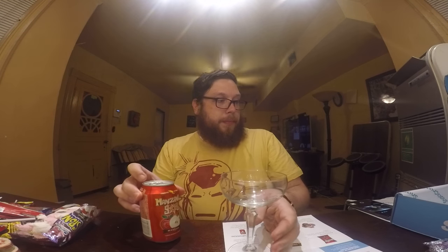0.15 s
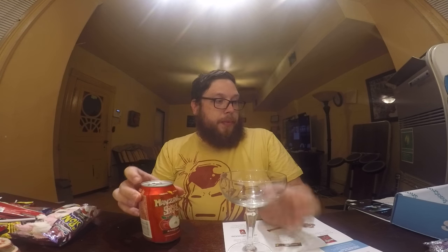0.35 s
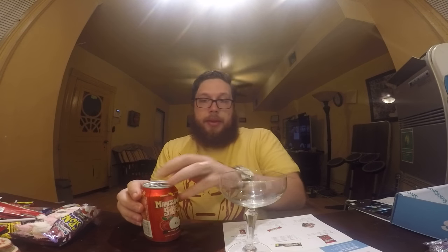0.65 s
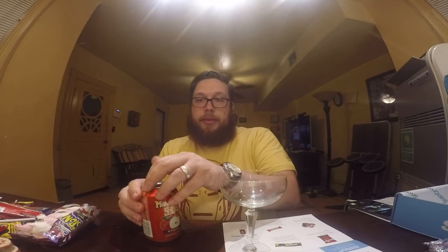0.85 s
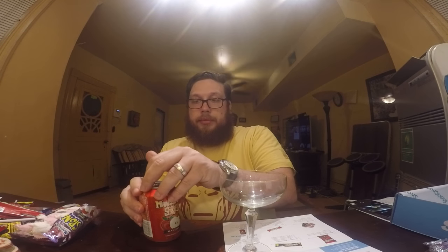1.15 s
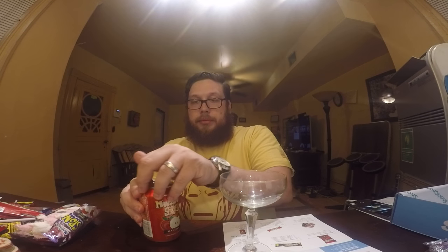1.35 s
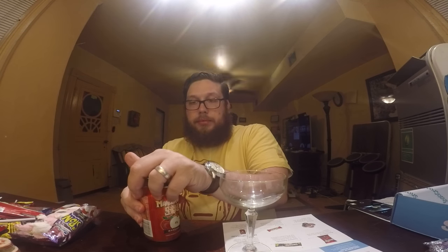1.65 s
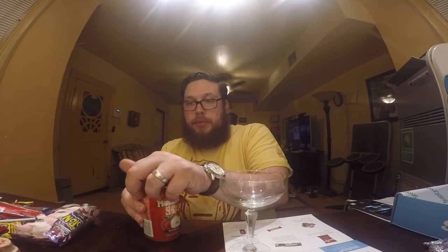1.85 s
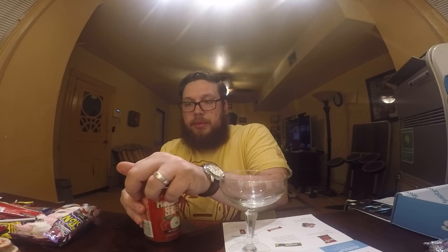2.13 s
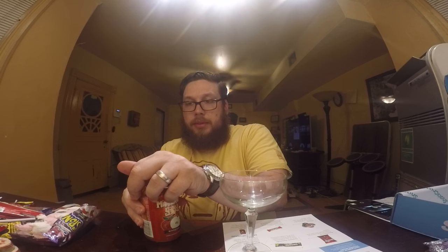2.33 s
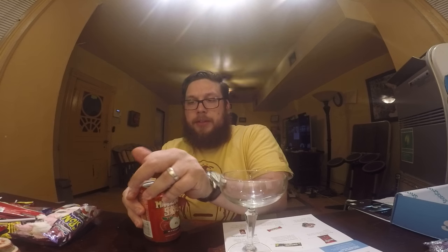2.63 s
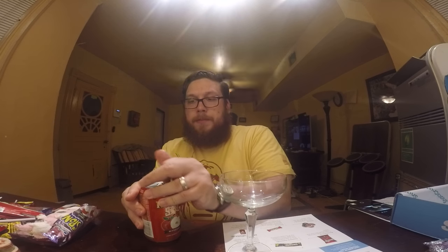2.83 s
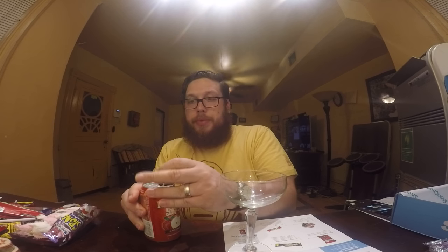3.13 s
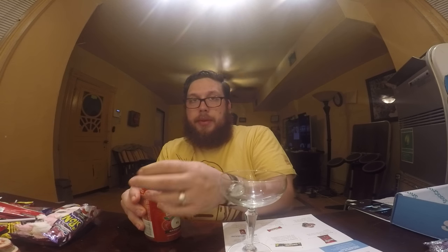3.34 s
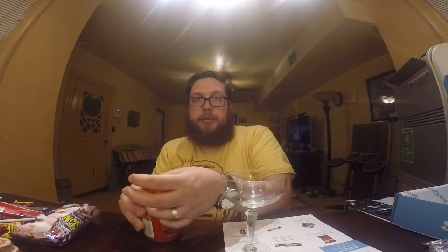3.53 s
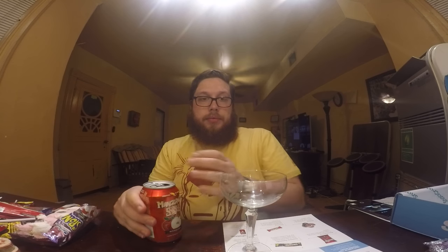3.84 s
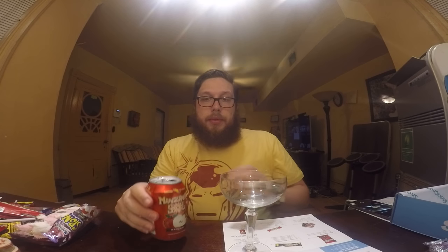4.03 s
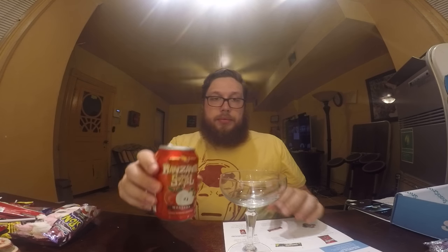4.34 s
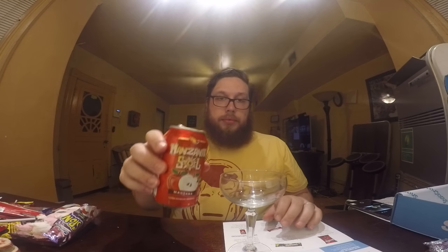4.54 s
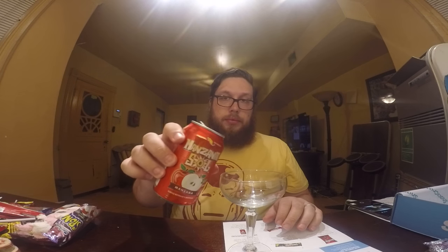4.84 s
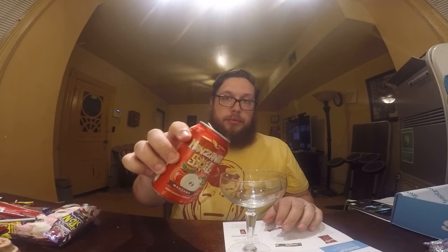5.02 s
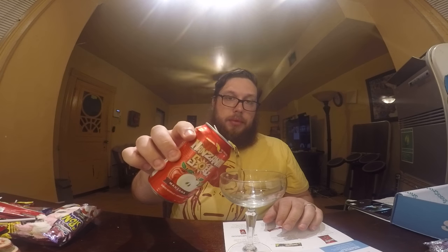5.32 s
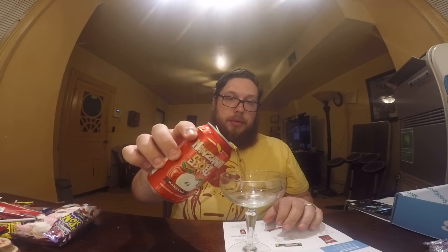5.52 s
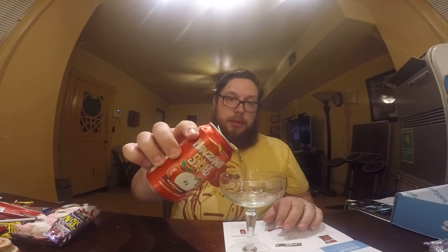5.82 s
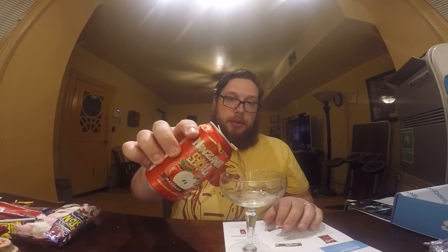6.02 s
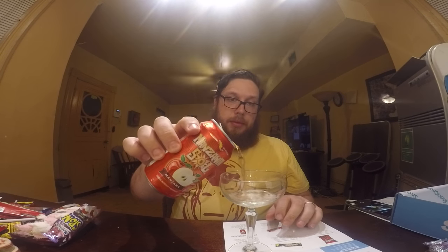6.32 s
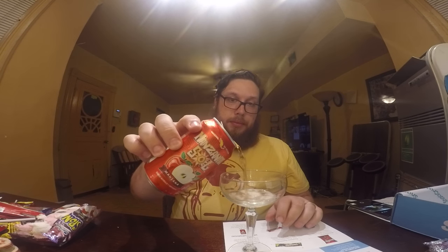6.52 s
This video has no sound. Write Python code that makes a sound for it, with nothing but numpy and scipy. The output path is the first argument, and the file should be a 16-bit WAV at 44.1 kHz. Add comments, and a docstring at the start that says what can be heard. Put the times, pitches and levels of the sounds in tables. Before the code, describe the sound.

Close to the microphone, in a room with a steady low hum, a can knocks on a table and a glass rings faintly. A soda can is then opened: a brief hiss and sharp crack, some small clicks, and a louder snap of metal. Fingers brush and bump the can lightly. Near the end, soda trickles into a glass, gently gurgling while tiny bubbles pop and fizz.

```python
"""A machine hums in a room as a drink can is set down: the table top thuds and a glass on it clinks.
The tab ticks, gas hisses through the broken seal, and the lid tears and snaps, ringing the metal.
After the loud snaps, gain control lowers the room noise, which then slowly recovers.
Last, the drink is poured into the shallow glass: trapped air pockets resonate as gurgles,
and small bubbles pop and fizz."""
import sys
import numpy as np
from scipy import signal
from scipy.fft import rfft, irfft
from scipy.io import wavfile
from scipy.ndimage import uniform_filter1d

SR = 44100
rng = np.random.default_rng(int(sys.argv[2]) if len(sys.argv) > 2 else 0)


def log_audio(samples):
    """Write samples as a 16-bit WAV file to the path given in sys.argv[1]."""
    # one column per channel
    frames = np.atleast_2d(samples).T
    # limit to full scale, then quantise
    limited = np.clip(frames, -1, 1)
    pcm = np.round(limited * 32767).astype(np.int16)
    wavfile.write(sys.argv[1], SR, pcm)


N = 294147

# ticks and snaps of tab and lid: (time [s], crack peak [dB], tilt [dB/octave], ring re crack [dB])
SNAPS = [(1.08, -33.5, 2, -11), (1.738, -53, 1.5, -3), (1.75, -43.5, -1.5, -2.5), (1.783, -32, -4, -10),
         (1.795, -44.5, 1.5, 2), (1.978, -11.5, 3.5, -13), (2.0393, -13.5, -3, -0.5),
         (2.052, 1.5, -1, -1.2), (2.059, -15.5, 2, -3), (2.333, -32.5, -0.5, -6.5), (2.356, -34, -2, -2),
         (2.3914, -19.5, 0.5, 0.5), (2.468, -24, 2, 3.5), (2.473, -20, 0.5, -6), (2.532, -34.5, -0.5, -0.2),
         (2.546, -24.5, -1.2, -2.5), (2.562, -26.5, 2, -1), (2.5737, 12, -0.3, -3.5),
         (2.7884, -24.5, 3, -12), (2.9034, -33, 0, -14), (2.912, -50, 7, -8), (2.981, -45.5, 0, 0),
         (3.169, -50.5, -1.5, 2.5), (3.479, -38, -4.5, -9)]
# the metal giving way: (frequency [Hz], spectral level [dB])
CRACK_SPECTRUM = [(100, -23.5), (400, -10), (1100, -19.5), (1800, 1.5), (3000, -2), (5500, -4.5),
                  (6700, -10), (7800, -9), (9500, -13.5), (15500, -25)]
# lid and wall of the can: (frequency [Hz], level [dB], t60 [s])
CAN_MODES = [(550.8, -17.5, 0.018), (1014, -16, .015), (1380, -12, 0.01), (1820, -2.5, 0.011),
             (2370, -5.5, 0.008), (2650, -3, .008), (3032, -3, 0.014), (3480, -3.5, .009),
             (3847, -1, 0.009), (4150, -3.5, .009), (4800, -4, 0.014), (5460, 2, 0.008), (5800, -7, .008),
             (7500, -8.5, 0.007)]


def lid_snaps():
    """Impulsive excitation: yielding metal gives a crack of noise and sets the can's modes ringing."""
    out = np.zeros(N)
    for time, db, tilt_db, ring_db in SNAPS:
        crack = burst(CRACK_SPECTRUM, tilt_db, pivot_hz=3000, t60=0.018, rise=0.00036)
        metal = ring(CAN_MODES, tilt_db, pivot_hz=3000, t60_scale=1.1, spread_db=1.8, rise=0.0004)
        add(out, time, amp(db) * crack)
        add(out, time, amp(db + ring_db) * metal)
    return out


# a leak, the rush and a last puff: (time [s], rise [s], hold [s], fall [s], level [dB])
GAS_PUFFS = [(1.983, .008, .014, .01, -39), (1.999, 0.01, .031, .03, -18), (2.052, .008, .004, .07, -28.5)]
# the gas jet: (frequency [Hz], spectral level [dB])
JET_SPECTRUM = [(120, -41), (200, -28), (827, -21.5), (1210, -16), (1840, -5.5), (2290, -3.5), (3300, -8),
                (5000, -4), (6800, -6), (8350, -9), (9310, -4.5), (15500, -8.5)]


def gas_hiss():
    """Turbulent jet noise: gas under pressure escapes through the seal."""
    jet = np.zeros(N)
    for time, *envelope in GAS_PUFFS:
        add(jet, time, stroke(*envelope, JET_SPECTRUM))
    sputter_db = 0.51 * unit_rms(uniform_filter1d(rng.standard_normal(N), size=60))
    return jet * amp(sputter_db)  # foam chokes the jet


# large air pockets dragged under by the stream: (time [s], level [dB], frequency [Hz])
GLUGS = [(5.658, -40, 2200), (5.7078, -31, 2484), (5.7678, -29.5, 2730), (5.7795, -33, 1660),
         (5.8225, -37, 1300), (5.8425, -41, 1190), (5.889, -41, 1410), (5.901, -35.5, 1550),
         (5.9952, -25.5, 1564), (6.0806, -34, 1370), (6.1397, -27.5, 1453), (6.1694, -31.5, 1550),
         (6.2038, -37, 1610), (6.2248, -35.5, 1350), (6.2417, -35, 1360), (6.2706, -25.5, 1550),
         (6.35, -32, 1630), (6.3707, -35, 1380), (6.3903, -36, 1460), (6.4043, -22.5, 1206),
         (6.4092, -25.5, 1454), (6.4197, -25.5, 1560), (6.4266, -28, 1230), (6.457, -35, 1310),
         (6.476, -19.5, 1188), (6.5222, -36.5, 980), (6.547, -38.5, 997), (6.577, -31.5, 1230),
         (6.5883, -37, 1480), (6.6144, -34, 1120), (6.6493, -41.5, 1210)]
BABBLE_START_S, BABBLE_DB, BABBLE_HZ, SINK_HZ_PER_S = 5.8, -47.5, 1550, 300


def gurgles():
    """Bubble resonance: each trapped air pocket pulsates as a spring against the mass of the liquid."""
    out = np.zeros(N)
    # faint pockets between the large ones, deeper as the glass fills
    when, loudness, pitch = rng.random((40, 3)).T
    elapsed = when * (N / SR - BABBLE_START_S)
    babble_db = BABBLE_DB + 12 * (loudness - 0.5)
    babble_hz = (BABBLE_HZ - SINK_HZ_PER_S * elapsed) * (1 + 0.42 * (pitch - 0.5))
    for time, db, hz in [*GLUGS, *zip(BABBLE_START_S + elapsed, babble_db, babble_hz)]:
        add(out, time, amp(db) * bubble(hz, t60=31 / hz, glide=0.094))
        split_pocket = bubble(hz * rng.uniform(1.9, 2.44), t60=0.0078, glide=0.1)
        add(out, time, amp(db - 23) * split_pocket)
        spray = burst(FILM_SPECTRUM, tilt_db=-2.8, pivot_hz=6000, t60=0.053, rise=0.0019)
        add(out, time, amp(db - 29) * spray)
    return out


# the clearest bursting bubbles: (time [s], level [dB], frequency [Hz], click re tone [dB])
POPS = [(5.6325, -49, 10940, -4), (5.717, -48, 2940, 5), (5.7343, -45, 6830, 0), (5.742, -41, 5800, -11),
        (5.769, -33, 3130, 3), (5.7756, -28.5, 4600, -16), (5.843, -42, 5340, -6), (5.924, -44.5, 6340, -4),
        (5.9809, -40.5, 7300, 0), (6.005, -40, 2710, -7), (6.0094, -46, 4760, -5),
        (6.1442, -40.5, 3070, -3), (6.1574, -43, 5400, -6), (6.2027, -43, 4320, -4), (6.271, -38, 3820, 2),
        (6.3255, -49, 5140, -5), (6.3663, -39.5, 5550, -7), (6.379, -41.5, 6440, 3),
        (6.4182, -44.5, 4530, 6), (6.649, -47, 5000, -9)]
# a bubble's film tearing: (frequency [Hz], spectral level [dB])
FILM_SPECTRUM = [(1500, -20), (3000, 3), (6000, -6), (10000, 2), (15500, -15)]


def pops():
    """Film rupture and cavity resonance: a bursting bubble clicks, then rings briefly."""
    out = np.zeros(N)
    for time, db, hz, click_db in POPS:
        add(out, time, amp(db) * bubble(hz, t60=67 / hz, glide=0.2))
        click = burst(FILM_SPECTRUM, tilt_db=0, pivot_hz=6000, t60=0.0049, rise=0.00012)
        add(out, time, amp(db + click_db) * click)
    return out


# the fizz following the flow: (time [s], level [dB])
FIZZ_LEVELS = [(5.552, -83), (5.72, -62), (5.87, -68), (6.0, -67.5), (6.3, -59.5), (6.45, -67.5),
               (6.67, -66)]
FIZZ_POPS_PER_S = 800


def fizz():
    """Shot noise: tiny independent pops of 16 pitches add up to a crackle."""
    strength = amp(4.5 * np.minimum(rng.exponential(1, N), 3.5))
    impulses = strength * (rng.random(N) < FIZZ_POPS_PER_S / SR)
    pitch_index = rng.integers(0, 16, N)
    crowd = np.zeros(N)
    for k, hz in enumerate(np.geomspace(2400, 14500, 16)):
        pop = amp(-1.5 * np.log2(hz / 5000)) * bubble(hz, t60=50 / hz, glide=0.1513)
        crowd += signal.oaconvolve(impulses * (pitch_index == k), pop)[:N]
    times, db = np.transpose(FIZZ_LEVELS)
    return unit_rms(crowd) * amp(np.interp(np.arange(N) / SR, times, db, left=-120))


# hand and can striking the table: (time [s], ring peak [dB], tilt [dB/octave], t60 scale [ratio])
THUDS = [(.175, -12.5, 0.3, 0.63), (.196, -20, -7.5, .6), (.486, -25.5, -1, 0.45), (.504, -25, -8, 0.85),
         (1.082, -31.5, -2.5, 0.35), (2.051, -29, -0.5, 0.73), (2.573, -13.5, -3, 0.6),
         (3.187, -22.5, 2.5, 0.59), (3.677, -33.5, -1, 0.72), (3.711, -36, -4.5, 0.9)]
# contact noise of a knock: (frequency [Hz], spectral level [dB])
CONTACT_SPECTRUM = [(60, -12.5), (130, -1), (300, 0.7), (800, -10), (1500, -22.5), (2400, -34.5),
                    (6000, -46.5), (12000, -63)]
# the table top: (frequency [Hz], level [dB], t60 [s])
TABLE_MODES = [(79.5, -2, 0.075), (137, -0.1, .14), (189, -3.5, 0.24), (233, 0, 0.14), (326, -6, 0.05),
               (428, -3, 0.05), (498.8, -5.5, 0.099), (625, -5.5, 0.11), (818, -9, 0.043),
               (1320, -19.5, 0.04)]


def table_thuds():
    """Plate vibration: an impact and one rebound excite the low modes of the table top."""
    out = np.zeros(N)
    for time, db, tilt_db, t60_scale in THUDS:
        contact = burst(CONTACT_SPECTRUM, tilt_db, pivot_hz=300, t60=0.06 * t60_scale, rise=0.001)
        blow = ring(TABLE_MODES, tilt_db, 300, t60_scale, spread_db=1, rise=0.0039)
        rebound = ring(TABLE_MODES, tilt_db - 5, 300, t60_scale, spread_db=0.54, rise=0.0041)
        add(out, time, amp(db - 5.5) * contact)
        add(out, time, amp(db) * blow)
        add(out, time + 0.014, amp(db - 4.5) * rebound)
    return out


# jolts that reach the glass: (time [s], peak [dB], t60 scale [ratio])
CLINKS = [(.175, -24.5, 1.1), (1.08, -35, 0.56), (2.903, -41, .4), (3.479, -47, 0.38)]
# the glass on the table: (frequency [Hz], level [dB], t60 [s])
GLASS_MODES = [(1380, -15, 0.32), (2180, -3, 0.042), (2376, -2, 0.052), (2750, 7, 0.011),
               (4650, -14.5, 0.021), (5410, -16, .03)]


def glass_clinks():
    """Free vibration: the jolted glass rings at its natural frequencies."""
    out = np.zeros(N)
    for time, db, t60_scale in CLINKS:
        add(out, time, amp(db) * ring(GLASS_MODES, 0, 2000, t60_scale, spread_db=0.8, rise=0.00035))
    return out


# hand movements: (time [s], rise [s], hold [s], fall [s], level [dB])
BRUSHES = [(0, 0.002, .03, .2, -58), (0.433, 0.052, .002, 0.01, -52), (0.759, 0.019, .002, 0.034, -56.5),
           (2.771, .004, 0.057, 0.021, -46.5), (3.282, 0.028, 0.0066, 0.059, -46)]
# skin and sleeve rubbing: (frequency [Hz], spectral level [dB])
BRUSH_SPECTRUM = [(350, -43), (600, -49), (915, -7), (1470, 0.5), (2790, -9), (3980, -4), (15500, -27.5)]


def hand_brushes():
    """Friction noise: sliding skin and sleeve make short, soft swishes."""
    out = np.zeros(N)
    for time, *envelope in BRUSHES:
        add(out, time, stroke(*envelope, BRUSH_SPECTRUM))
    return out


# steady room noise: (frequency [Hz], spectral level [dB])
AIR_SPECTRUM = [(12, -28.5), (20, -3), (42, 0), (74, -4.5), (95, -19), (122, -12.5), (153, -20),
                (245, -20.5), (393, -27), (597, -29), (788, -36), (1450, -38), (1630, -36), (2150, -40),
                (15500, -62.5)]
# lines of the machine's hum: (frequency [Hz], width [Hz], level [dB])
HUM_LINES = [(37.7, 10, -46.5), (59.03, 10, -47.5), (119.17, 5.8, -53), (241.3, 11, -56.5), (465, 8, -68),
             (608.8, 10, -65.5), (1610, 11, -71.5)]


def room_hum():
    """Stationary noise: a machine's narrow spectral lines stand on a broadband floor."""
    out = amp(-40) * noise(AIR_SPECTRUM, N)
    hz = np.fft.rfftfreq(N, 1 / SR)
    for line_hz, width_hz, db in HUM_LINES:
        line_shape = 1 / (1 + (2 * (hz - line_hz) / width_hz) ** 2)
        out += amp(db) * unit_rms(irfft(rfft(rng.standard_normal(N)) * line_shape, N))
    return out


# reverberation time: (frequency [Hz], t60 [s])
ROOM_T60 = [(100, 0.84), (400, 0.23), (1200, 0.32), (3000, 0.36), (7000, 0.41), (10000, 0.27),
            (15000, 0.24)]
# reflections from table and walls: (delay [s], level [dB])
ECHOES = [(.0022, -13), (.0045, -11), (.0088, -8), (0.011, -13.5), (0.017, -14), (.023, -17)]


def room(sound, echo_db, tail_db):
    """Reverberation: direct sound, early reflections and a diffuse tail, each band at its own decay."""
    taps = np.zeros(SR // 2)
    slots = np.arange(300, SR // 2 - 20, 20)
    taps[slots + rng.integers(0, 20, len(slots))] = rng.choice([-1., 1.], len(slots))
    hz, t, bands = signal.stft(taps, SR, nperseg=256)
    decay = amp(-60 * t / value_at(ROOM_T60, hz)[:, None])
    tail = signal.istft(bands * decay, SR, nperseg=256)[1]
    response = amp(tail_db) * tail / np.linalg.norm(tail)
    response[0] = 1  # direct sound
    for delay, db in ECHOES:
        add(response, delay, amp([db + echo_db]))
    return signal.fftconvolve(sound, response)[:N]


def ring(modes, tilt_db, pivot_hz, t60_scale, spread_db, rise):
    """Modal superposition: each blow lands elsewhere and shares its energy differently among modes."""
    hz, db, t60 = np.transpose(modes)[:, :, None]
    t = np.arange(SR // 4) / SR
    share, detune, phase = rng.standard_normal((3, len(modes), 1))
    db = db + tilt_db * np.log2(hz / pivot_hz) + spread_db * share
    envelopes = amp(db - 60 * t / (t60 * t60_scale))
    tones = np.sin(2 * np.pi * hz * (1 + 0.00974 * detune) * t + phase)
    out = np.sum(envelopes * tones, axis=0) * np.minimum(t / rise, 1)
    return out / abs(out).max()


def bubble(hz, t60, glide):
    """Damped oscillator: a dying sine whose pitch rises as the bubble nears the surface."""
    t = np.arange(round(t60 * SR)) / SR
    envelope = amp(-60 * t / t60) * np.minimum(t * hz / 1.3, 1)
    return envelope * np.sin(2 * np.pi * hz * (t + glide * t ** 2 / t60))


def burst(spectrum, tilt_db, pivot_hz, t60, rise):
    """Broadband transient: the phases of a puff dying in t60, under a smooth spectrum, damped further."""
    t, hz = np.arange(2048) / SR, np.fft.rfftfreq(2048, 1 / SR)
    puff = rfft(rng.standard_normal(2048) * amp(-60 * t / t60))
    colour = amp(value_at(spectrum, hz) + tilt_db * np.log2((hz + 50) / pivot_hz))
    envelope = amp(-20 * t / t60) * np.minimum(t / rise, 1)
    fade = np.cos(np.pi / 2 * t / t[-1]) ** 2
    out = irfft(colour * puff / abs(puff)) * envelope * fade
    return out / abs(out).max()


def stroke(rise, hold, fall, db, spectrum):
    """Amplitude envelope: coloured noise rises by 28 dB, holds and falls again."""
    t = np.arange(0, rise + hold + fall, 1 / SR)
    shape_db = np.interp(t, [0, rise, rise + hold, rise + hold + fall], [-28, 0, 0, -28])
    return amp(db + shape_db) * noise(spectrum, len(t))


def noise(spectrum, size):
    """Spectral shaping: white noise coloured by a spectrum, at rms 1."""
    hz = np.fft.rfftfreq(size, 1 / SR)
    return unit_rms(irfft(rfft(rng.standard_normal(size)) * amp(value_at(spectrum, hz)), size))


def value_at(points, hz):
    """Interpolation of a table on a log-frequency axis."""
    point_hz, values = np.transpose(points)
    return np.interp(np.log(hz + 1), np.log(point_hz + 1), values)


def amp(db):
    """Amplitude ratio of a level in dB."""
    return 10 ** (np.asarray(db) / 20)


def unit_rms(x):
    """Normalisation to rms 1."""
    return x / np.sqrt(np.mean(x ** 2) + 1e-20)


def add(mix, time, sound):
    """Superposition: mixes a sound in at a time in seconds."""
    part = mix[round(time * SR):][:len(sound)]
    part += sound[:len(part)]


def scene():
    """Superposition in one room; knocks come mostly through the table and sound drier than the can."""
    can = room(lid_snaps() + gas_hiss(), echo_db=-1.7, tail_db=-8)
    handling = room(glass_clinks() + table_thuds() + hand_brushes(), echo_db=-1.5, tail_db=-10)
    pour = room(gurgles() + pops() + fizz(), echo_db=-3, tail_db=-12.5)
    return (can + handling + pour + room_hum())[None]


def record(dry):
    """Compression: gain falls fast and recovers slowly; overload clips; the top octave rolls off."""
    threshold_db, cut_db_per_db = -15.5, 0.56
    power_db = 10 * np.log10(abs(uniform_filter1d(dry[0] ** 2, size=400)) + 1e-12)
    release_db = 17 * np.arange(N) / SR  # a held peak sinks 17 dB a second
    held_db = np.maximum.accumulate(power_db + release_db) - release_db
    excess_db = np.maximum(held_db - threshold_db, 0)
    smoothed_db = signal.lfilter([1 / 900], [1, 1 / 900 - 1], excess_db)  # 20 ms attack
    clipped = np.clip(dry / amp(cut_db_per_db * smoothed_db), -0.93, 0.93)
    treble_shelf = 0.04 * signal.unit_impulse(301, "mid") + 0.96 * signal.firwin(301, 15350, fs=SR)
    lowpass = signal.firwin(511, 16064, window=("kaiser", 9), fs=SR)
    return signal.oaconvolve(clipped, np.convolve(treble_shelf, lowpass)[None], "same")


dry = scene()
out = record(dry)
log_audio(out)
```